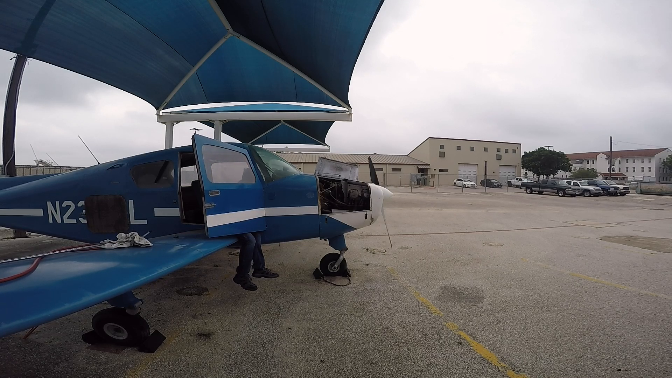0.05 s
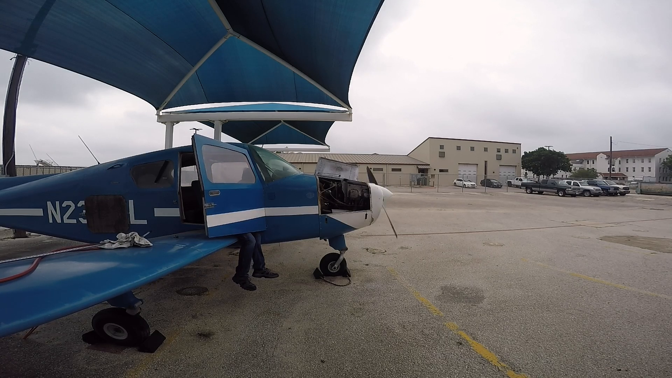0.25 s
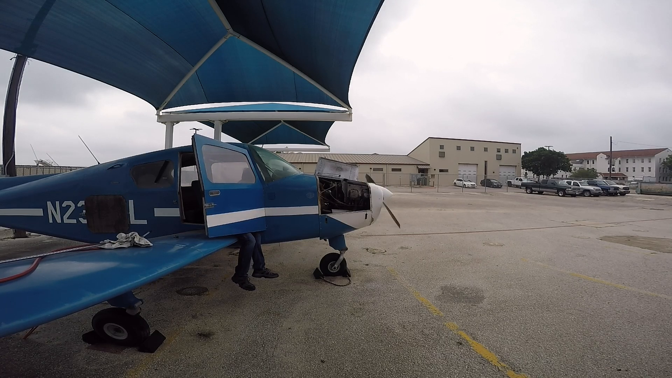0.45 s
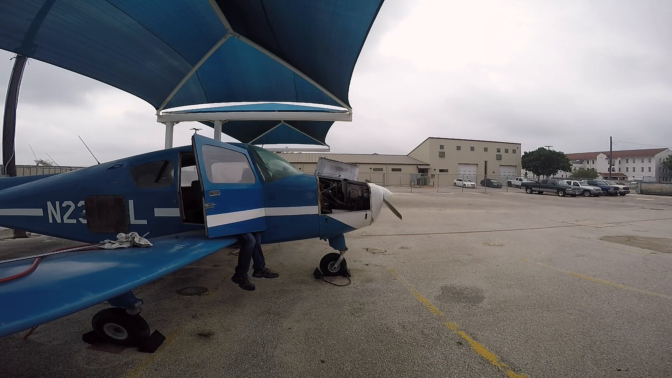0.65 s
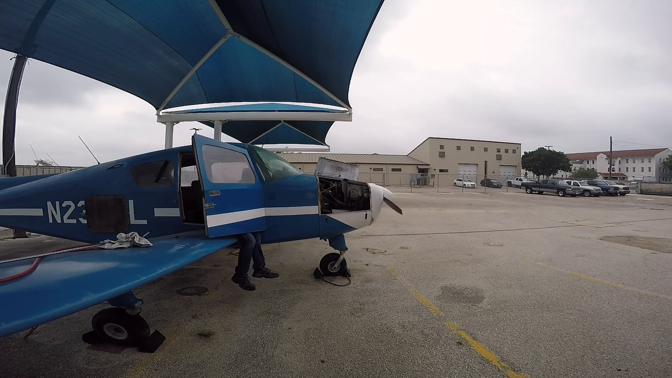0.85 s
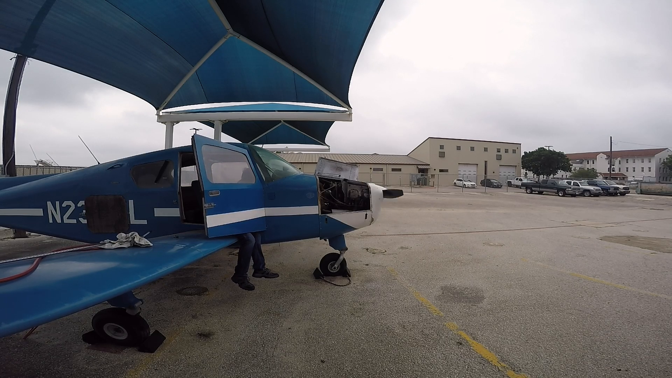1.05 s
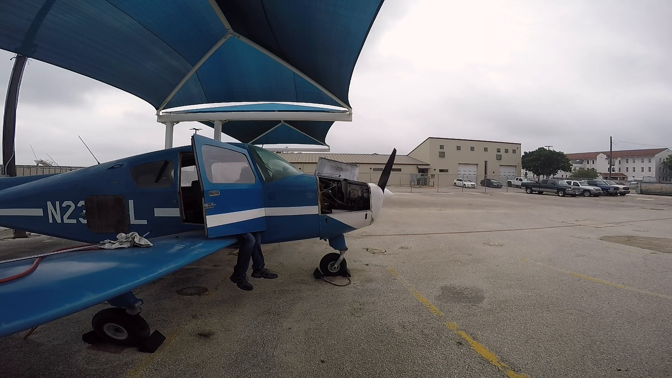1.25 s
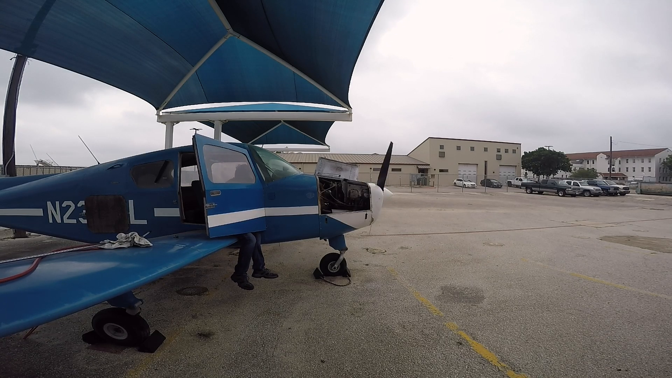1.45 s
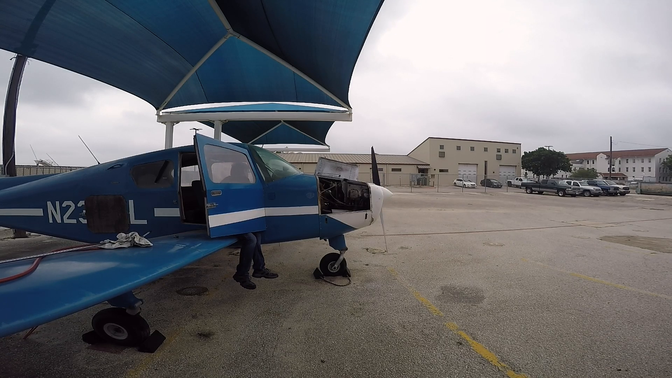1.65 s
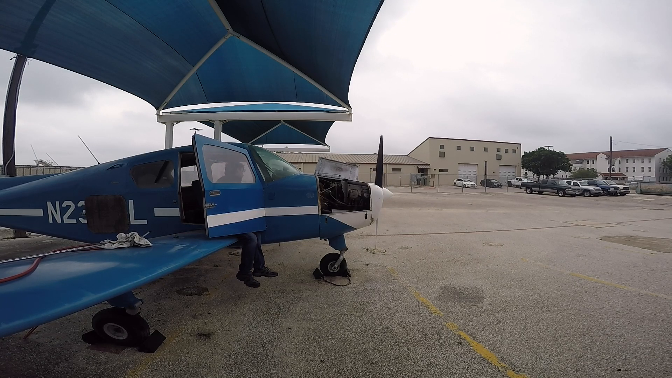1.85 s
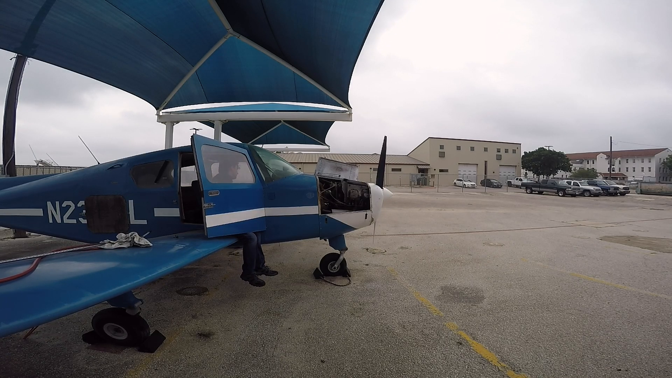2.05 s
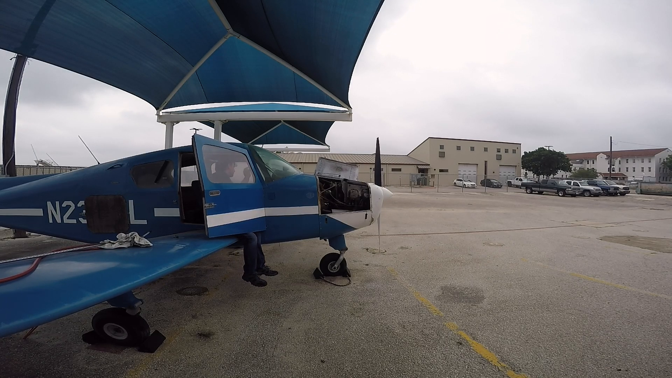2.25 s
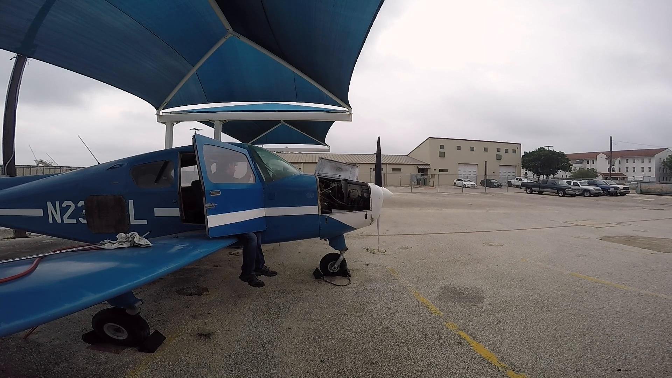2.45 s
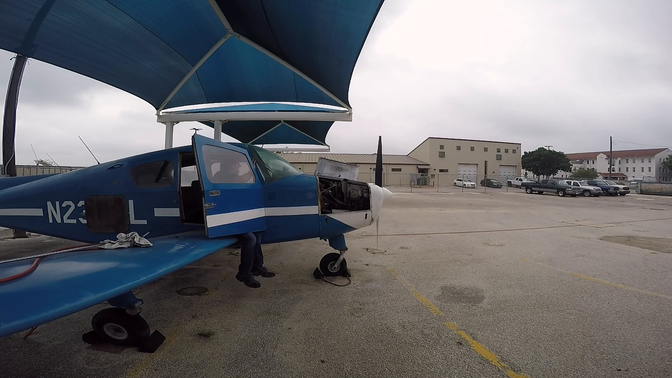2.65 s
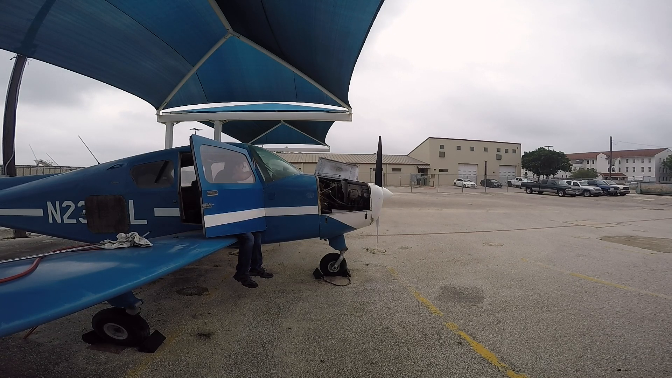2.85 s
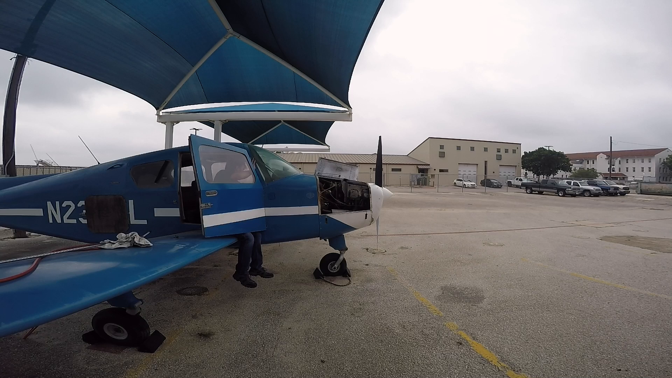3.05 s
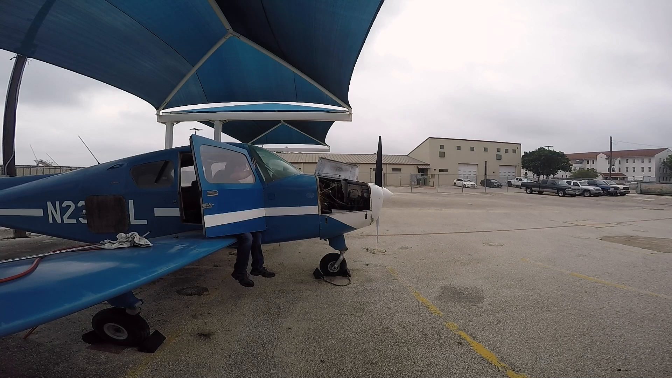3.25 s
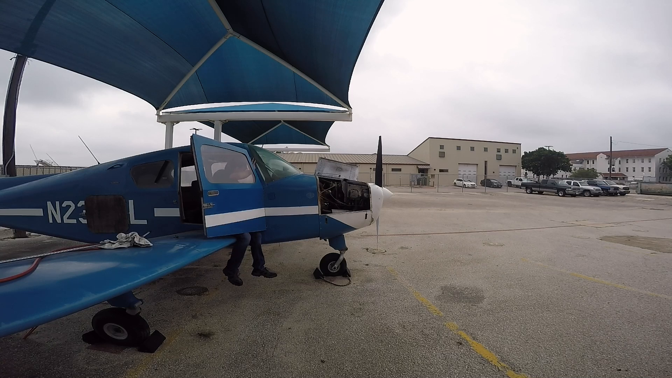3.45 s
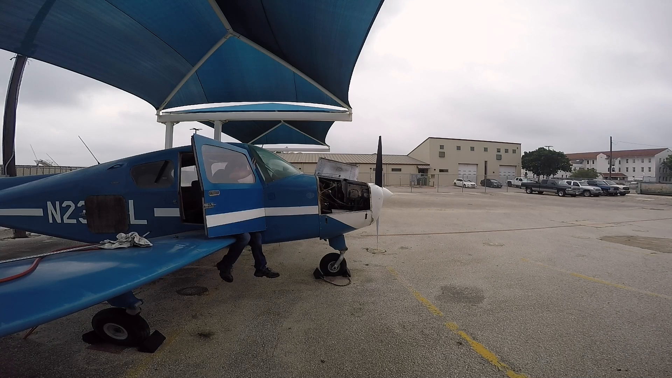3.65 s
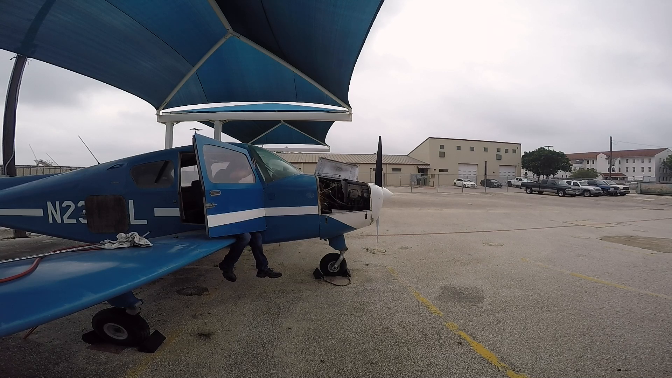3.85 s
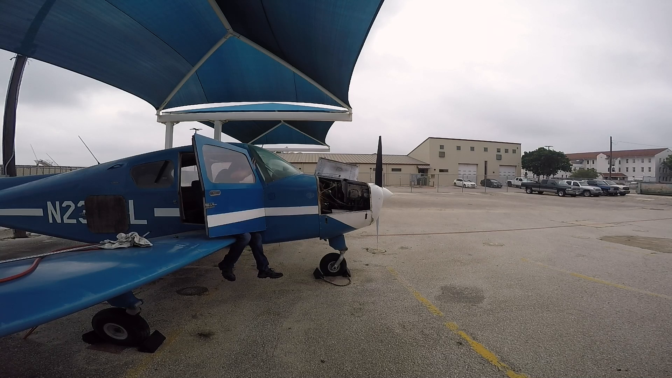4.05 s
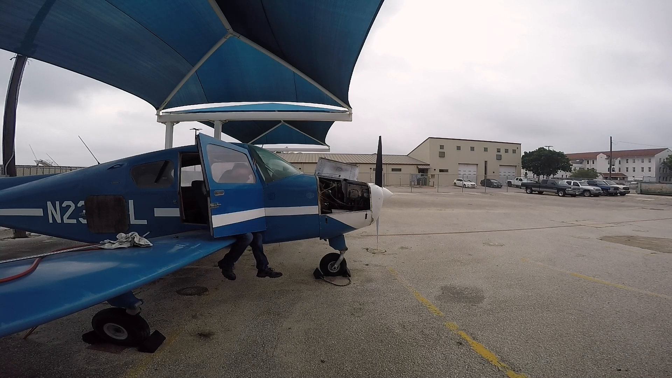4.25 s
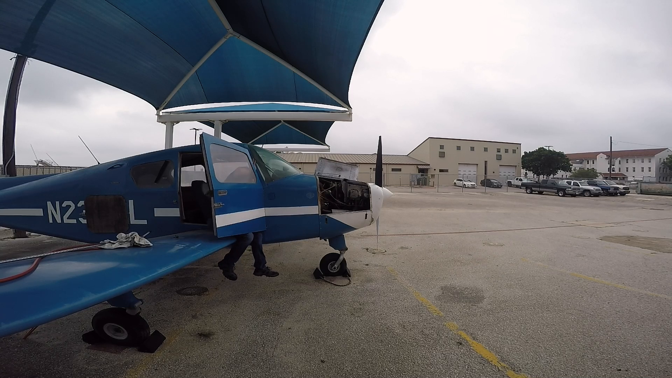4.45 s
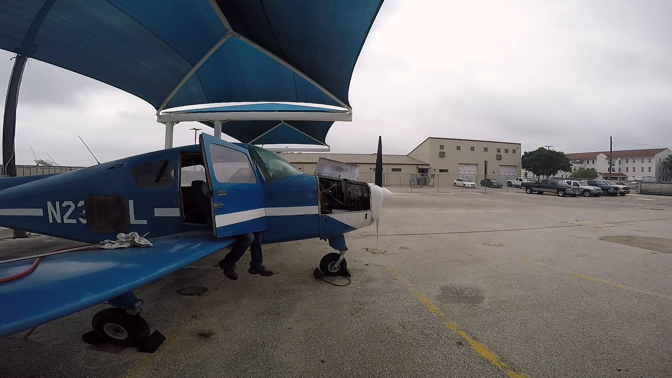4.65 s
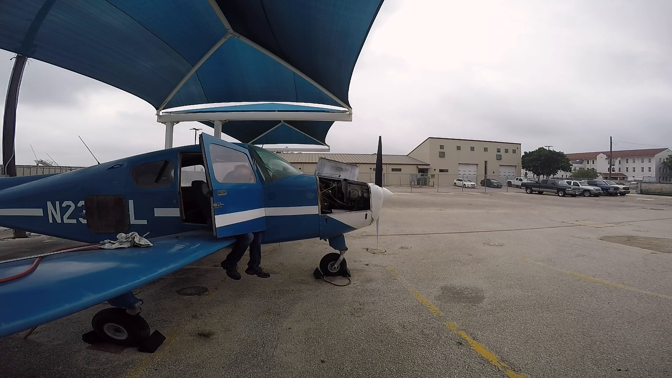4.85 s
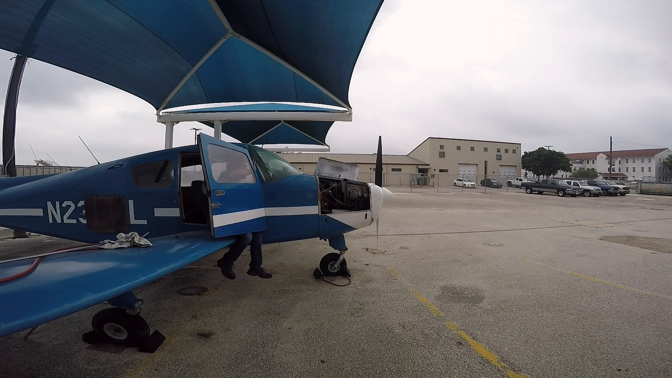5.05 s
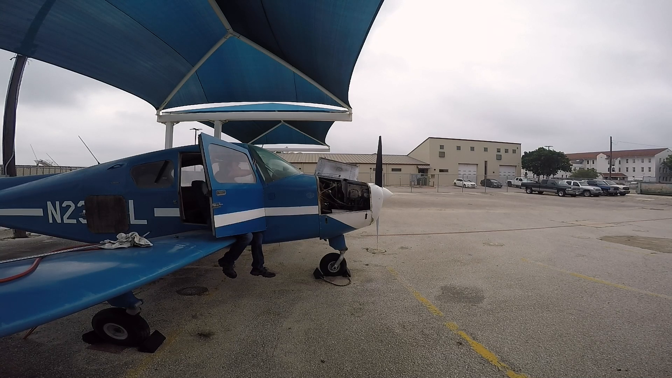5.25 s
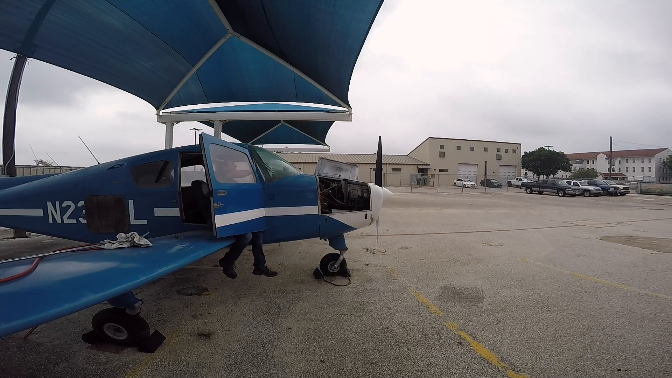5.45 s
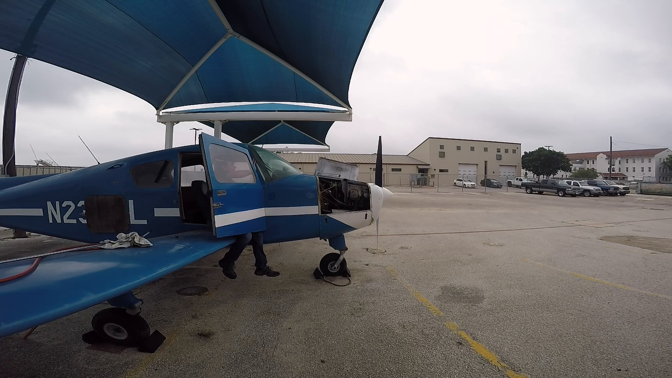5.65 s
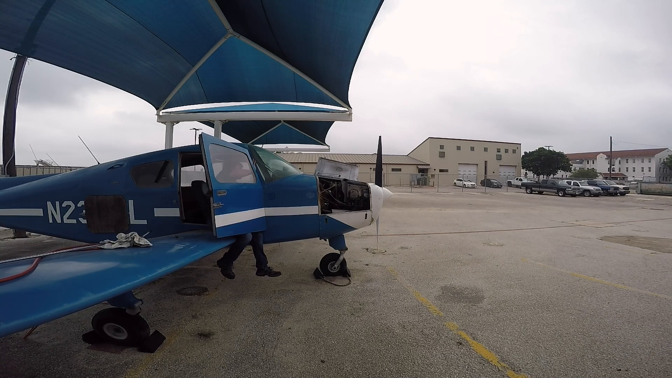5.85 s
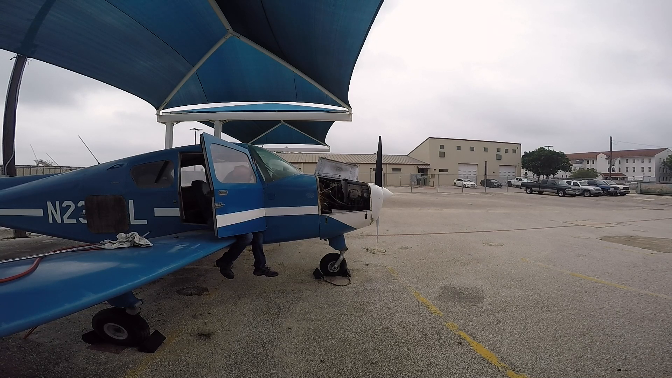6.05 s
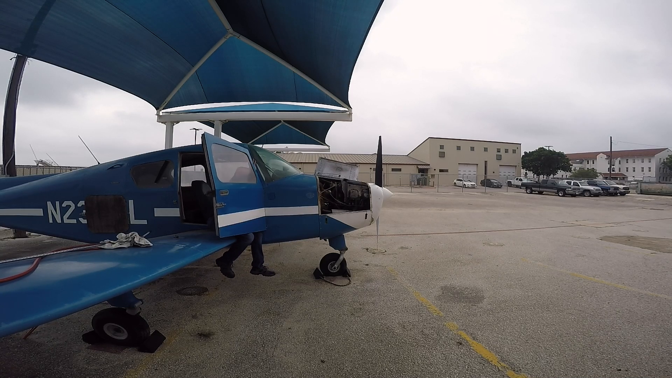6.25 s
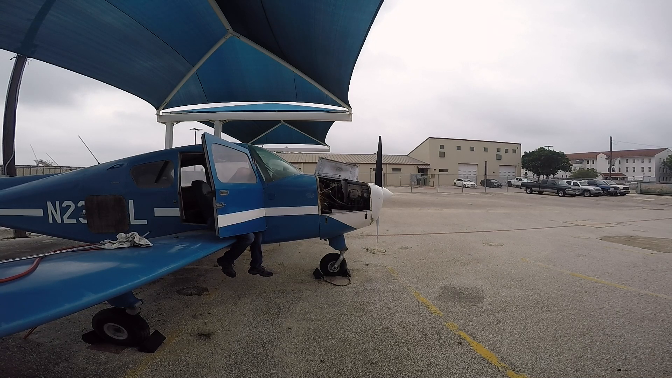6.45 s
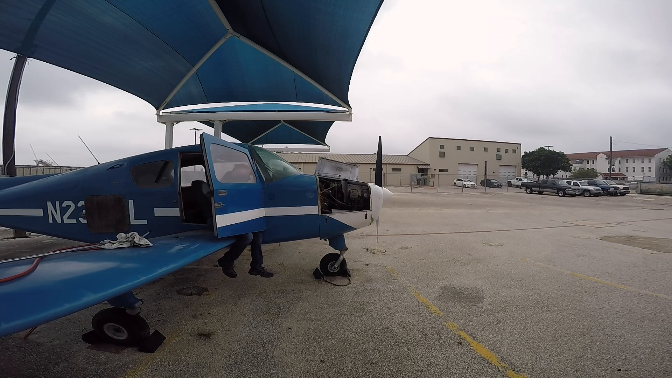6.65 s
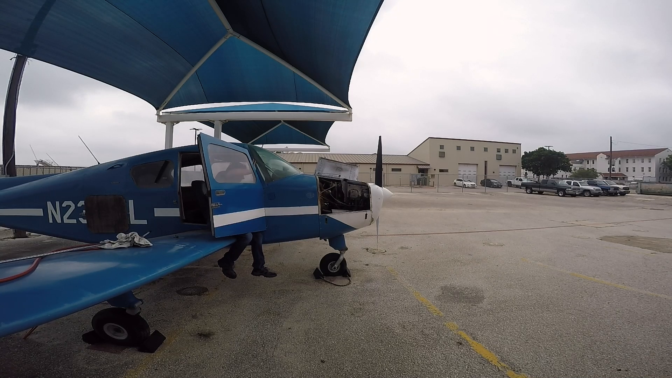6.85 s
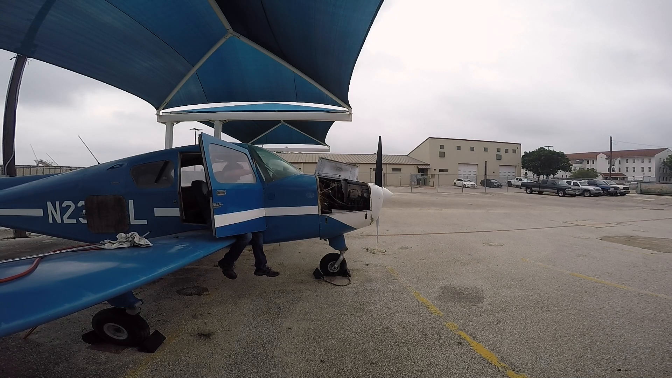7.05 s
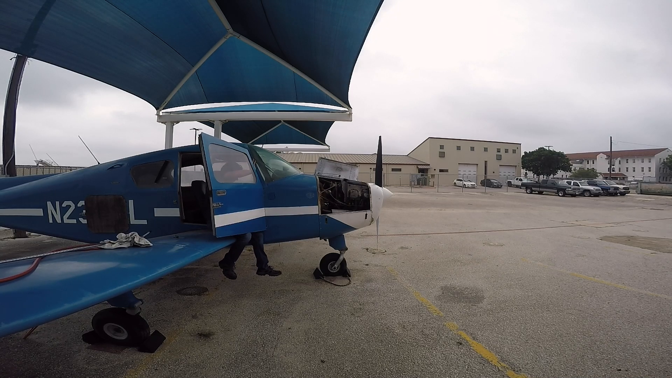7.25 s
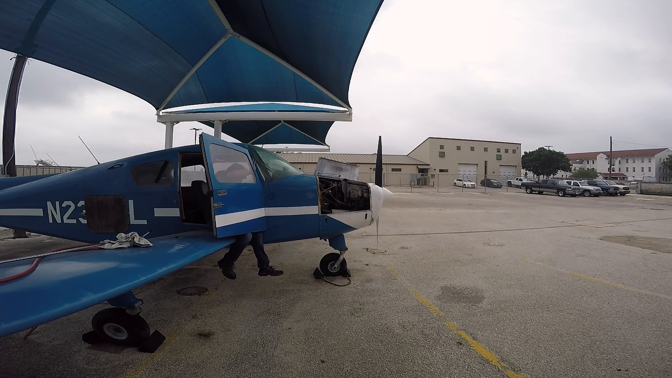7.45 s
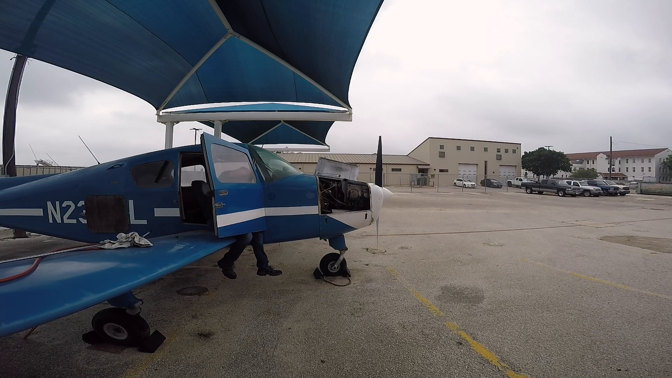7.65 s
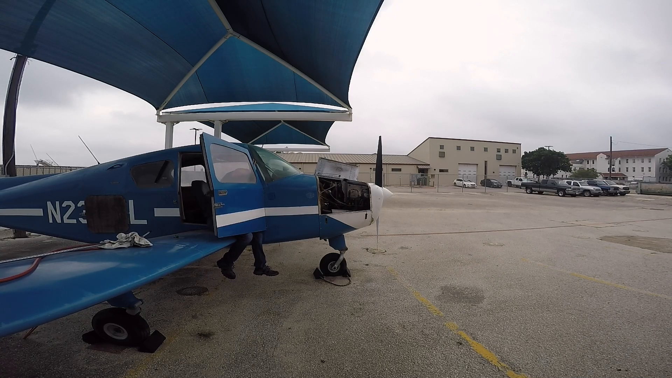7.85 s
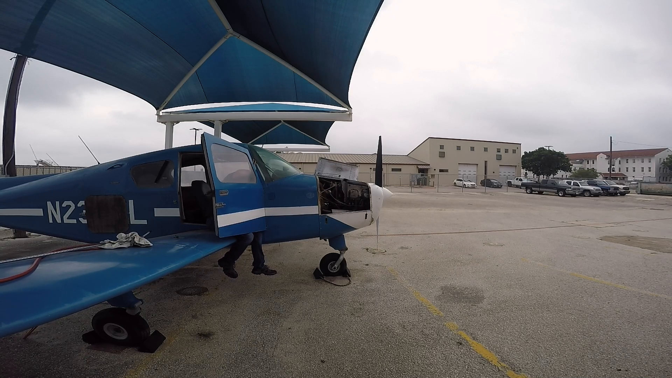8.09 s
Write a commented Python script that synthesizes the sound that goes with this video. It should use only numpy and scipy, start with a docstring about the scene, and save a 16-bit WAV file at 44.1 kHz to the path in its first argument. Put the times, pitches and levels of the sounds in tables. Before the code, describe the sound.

From the start, a light aircraft's piston engine cranks on its starter close to the microphone, outdoors with a slight dull echo. Gears rasp and clatter in even chugs, about five a second. At about 1.2 seconds the crank stalls without firing and the starter is released. The propeller rocks back with a metallic clatter and groan around 1.5 seconds, and a hissing, falling whine fades shortly after 2 seconds. Throughout, another engine idles farther off with a steady low throb and rapid ticking, over the airfield's low rumble; this quieter background continues to the end at about 8 seconds. Short, light knocks with a brief panel rattle come from the cabin near 1.6, 2, 4.1, 4.7, 5.9 and 6.4 seconds. Very faint, thin squeals waver in the distance around 4 seconds and again from about 6.3 to 7.7 seconds.

```python
"""A light aircraft fails to start

Close by, under a shade canopy, one microphone hears a piston engine cranked on its starter. The gears
rasp up each compression and clatter as it lets go. The crank stalls, the starter is released and the
propeller rocks back; the engine never fires. Out on the open ramp another engine idles and ticks
throughout, over a low rumble. There are a few knocks from the cabin and faint squeals far off."""
import sys
import numpy as np
from scipy import signal
from scipy.fft import rfft, irfft
from scipy.io import wavfile
from scipy.ndimage import uniform_filter1d

SR = 44100
rng = np.random.default_rng(int(sys.argv[2]) if len(sys.argv) > 2 else 0)


def to_wav(s):
    """Save 16-bit WAV."""
    ch = np.atleast_2d(s).T  # columns
    pcm = np.round(np.clip(ch, -1, 1) * 32767)  # PCM
    wavfile.write(sys.argv[1], SR, pcm.astype(np.int16))


N = 358091
T = np.arange(N) / SR
HZ = np.fft.rfftfreq(8192, 1 / SR)
RELEASE_S, UNMESH_S = 1.315, 1.57  # the current is cut; the pinion leaves the ring gear

# Pistons topping their compressions. Each row: time in seconds, clatter in dB, whine on the way up in dB.
COMPRESSIONS = [(-.05, -11.5, -46), (.153, -12.5, -42), (.373, -12, -47), (.584, -12.5, -50),
                (.797, -13.5, -26), (.994, -14.5, -40)]
# The compression that stalls the crank: start and end in seconds, rasp in dB, whine in dB.
STALL = (1.1278, 1.3016, -18, -30)
# The gears snatch once going into the stall: start and end in seconds.
JOLT = (1.188, 1.201)
# Teeth scraping as the crank runs backwards. Each row: start and end in seconds, rasp in dB.
BACK_SCRAPES = [(1.321, 1.348, -22), (1.48, 1.59, -30)]
# Spectra of the teeth meshing and rasping. Each row: frequency in Hz, relative level in dB.
MESH_SPECTRUM = [(120, -22), (300, 4), (1200, 2.5), (2300, 3.5), (3200, 1.5), (5500, -1.5), (8000, -1),
                 (12000, -12), (15000, -15)]
RASP_SPECTRUM = [(150, -7.5), (600, -11.5), (1500, -10), (2800, 3.5), (4000, -2.5), (6300, -15),
                 (7100, 0.5), (8700, 2.5), (9400, -6.5), (11400, -10.5), (12050, -3), (12700, -14),
                 (15000, -39)]


def starter(teeth_per_s=463, surge=.075, sag=.02, wobble=.018, squeeze_s=.102, rasp_db=-18.5,
            mesh_db=-30, pinion_db=-44.5, jolt_db=6):
    """Close by, gear teeth strike in turn; they slow, rasp and whine under load, then race as it lets go."""
    squeezes = [(top - squeeze_s, top, rasp_db, db) for top, _, db in COMPRESSIONS] + [STALL]
    strain = sum(arch(start, end) ** .8 for start, end, _, _ in squeezes)
    relief = sum(blow(top, rise=.012, fall=.06) for top, _, _ in COMPRESSIONS)
    speed = decay(UNMESH_S, fall=.38) * (1 + surge * relief - sag * strain + wobble * drift(30))
    teeth = np.cumsum(teeth_per_s * speed) / SR
    tooth_size = gain_of(2.6 * drift(320))
    strikes = np.diff(np.floor(teeth), prepend=0) * tooth_size * np.sqrt(SR / teeth_per_s)
    strikes = colour(strikes, spectrum([(900, -9), (1400, -6), (1900, 1), (15000, 2)]))  # small hard teeth
    contact = 1 + .45 * np.cos(2 * np.pi * teeth)
    grit = contact * rattle(5000, spread_db=4.6)
    driven = gain_of(mesh_db + strain) * decay(RELEASE_S, fall=.027)  # 1 dB louder at full strain
    coasting = gain_of(pinion_db) * blow(RELEASE_S, rise=UNMESH_S - RELEASE_S, fall=.32)
    mesh = colour((strikes + grit) * (driven + coasting), housing() * spectrum(MESH_SPECTRUM))
    load = sum(gain_of(db) * arch(start, end) ** .8 for start, end, db, *_ in squeezes + BACK_SCRAPES)
    load *= gain_of(jolt_db * arch(*JOLT))
    scrape = unit_rms(contact * rattle(7000, spread_db=2.1) * gain_of(1.14 * drift(88)))
    rasp = colour(load * scrape, housing() * spectrum(RASP_SPECTRUM))
    whine_level = sum(gain_of(db) * arch(start, end) ** .5 for start, end, _, db in squeezes)
    whine = whine_level * np.sqrt(2) * np.sin(2 * np.pi * 4 * teeth)  # fourth harmonic of the tooth rate
    return mesh + rasp + whine


# The crank falling back into the slack of the gears. Each row: start in seconds, level in dB,
# rise and fall time constant in seconds, tilt in dB at treble_hz.
RECOILS = [(1.325, -28.5, 0.017, 0.071, -10), (1.392, -21, 0.057, 0.091, -3.5)]
# Spectrum of the blows on the housing. Each row: frequency in Hz, relative level in dB.
CLATTER_SPECTRUM = [(100, -53), (230, 6), (500, 5.5), (1100, 3.5), (2500, 8), (4500, 6.5), (5800, -2.5),
                    (8000, -0.5), (11000, -4), (15000, -17.5)]


def gear_clatter(crack_db=-20.5, rise_s=.013, fall_s=.052, tilt_db=-2, treble_hz=2200, rebound=.17):
    """Past each top, trapped air throws the crank forward: the slack gears crack, clatter and rebound."""
    impacts = unit_rms(rattle(6000, spread_db=.97) * gain_of(1.4 * drift(59)))
    treble = HZ ** 2 / (HZ ** 2 + treble_hz ** 2)
    metal = housing() * spectrum(CLATTER_SPECTRUM)
    # the first teeth to meet strike hard and bright
    cracks = gain_of(crack_db) * sum(blow(top, rise=.0061, fall=.015) for top, _, _ in COMPRESSIONS)
    out = colour(cracks * rattle(6000, spread_db=1), metal * treble)
    throws = [(top, db, rise_s, fall_s, tilt_db) for top, db, _ in COMPRESSIONS]
    for start, db, rise, fall, tilt in throws + RECOILS:
        force = blow(start, rise, fall) + rebound * arch(start + .038, start + .12)
        out += colour(impacts * gain_of(db) * force, metal * gain_of(2 * tilt * treble))
    return out


# The propeller rocking back: start and end in seconds, resonance and half-width in Hz, level in dB.
GROAN = (1.38, 1.5745, 1150, 450, -25.5)


def gear_groan():
    """The gears drag backwards through one broad resonance of the housing."""
    start, end, hz, width, db = GROAN
    drag = rattle(4000, spread_db=1.65) * arch(start, end) ** .99 * gain_of(db)
    return colour(drag, housing() * resonance(hz, width))


# The motor coasting: a time in seconds, commutator bars per second then, slowing time constant in seconds.
COAST = (1.66, 780, .31)
# Whine of its brushes. Each row: multiple of the bar rate, relative level in dB.
BRUSH_HARMONICS = [(2, -7), (3, -8), (4, -8), (6, -2), (7, 0), (8, -2), (10, -6)]
# Spectrum of the brushes. Each row: frequency in Hz, relative level in dB.
BRUSH_SPECTRUM = [(300, -3), (1200, 12), (2500, -9), (3500, 2), (4500, 1), (5800, 0), (6800, 2), (8000, -9),
                  (10000, -1), (15000, -22)]


def starter_rundown(level_db=-37.5, slows_from_s=1.45):
    """Released, the starter motor coasts; its brushes hiss and their rough whine falls away."""
    at_s, bars_per_s, slowing_s = COAST
    bars = np.cumsum(bars_per_s * np.exp(-(np.maximum(T, slows_from_s) - at_s) / slowing_s)) / SR
    whine = sum(gain_of(db) * np.sin(2 * np.pi * k * bars + 1.1 * drift(90)) for k, db in BRUSH_HARMONICS)
    friction = unit_rms(.38 * unit_rms(whine) + rng.standard_normal(N))
    level = gain_of(level_db) * blow(RELEASE_S, rise=.23, fall=.18)
    return colour(friction * level, spectrum(BRUSH_SPECTRUM))


# Resonances of the crankcase and starter housing. Each row: frequency in Hz, width in Hz, lift in dB.
HOUSING_MODES = [(246, 53, 3), (614.5, 22, 10.5), (686, 26, 9), (923, 38, 10), (1000, 150, 6),
                 (1176, 72, 11.5), (1254, 85, 5.5), (1360, 210, 5.5), (1531, 41, 10), (1816, 19, 13),
                 (1923, 68, 11), (2080, 61, 12.5), (2293, 97, 11.5), (2380, 52, 13.5), (2826, 160, 11.5),
                 (3150, 58, 4.5), (3510, 110, 4.5), (4320, 140, 1), (4500, 120, -5.5), (5070, 70, 5),
                 (7150, 970, 7.5), (8470, 750, 8), (10040, 180, 9), (12010, 620, 8.5)]


def housing():
    """Gain of the engine's metal over HZ: modes with a positive lift stand on a flat base."""
    peaks = sum((gain_of(db) ** 2 - 1).clip(0) / (1 + (2 * (HZ - hz) / width) ** 2) ** 1.62
                for hz, width, db in HOUSING_MODES)
    return np.sqrt(1 + peaks)


# Knocks about the cabin. Each row: start in seconds, level in dB, the rattle's fall time constant
# in seconds, pitch of the clack in Hz.
KNOCKS = [(1.631, -37, 0.0085, 2160), (1.969, -35, 0.038, 3000), (4.107, -43.5, 0.02, 1380),
          (4.695, -33, 0.031, 1070), (4.736, -43, 0.012, 2500), (5.884, -39, 0.01, 970),
          (6.449, -33.5, 0.019, 1060)]
# Spectrum of the rattling panel. Each row: frequency in Hz, relative level in dB.
PANEL_SPECTRUM = [(150, 11.5), (400, 11.5), (1000, 2.5), (1700, 5), (2600, 0.5), (4200, -6), (6000, -14),
                  (8000, -3), (15000, -20)]


def cabin_knocks():
    """From the near aircraft, each knock is a short pitched clack and a brief rattle of the panel."""
    out = np.zeros(N)
    for start, db, fall, hz in KNOCKS:
        noise = gain_of(db) * rng.standard_normal(N)
        out += colour(noise * blow(start, rise=.0058, fall=fall), spectrum(PANEL_SPECTRUM))
        out += colour(noise * blow(start, rise=.00058, fall=.0072), resonance(hz, half_width_hz=260))
    return out


def canopy(direct, wet_db=-20, t60_s=.39, dull_hz=3500, echoes_per_s=2000):
    """Weak, dull echoes off canopy, wing and concrete follow the direct sound to the microphone."""
    t = T[:SR]
    taps = rng.standard_normal(SR) * (rng.random(SR) < echoes_per_s / SR)
    taps *= (t > .008) * gain_of(-60 * t / t60_s)
    echoes = signal.oaconvolve(direct, taps / np.linalg.norm(taps))[:N]
    return direct + gain_of(wet_db) * colour(echoes, 1 / np.sqrt(1 + (HZ / dull_hz) ** 2))


# Speed of the other engine. Each row: time in seconds, firings per second.
IDLE_SPEED = [(2.0, 25.861), (6.0, 26.417), (6.8, 26.121), (7.2, 26.465)]
# Its exhaust note. Each row: multiple of the firing rate, level in dB.
EXHAUST_HARMONICS = [(2, -32), (3, -31), (4, -37), (5, -50), (6, -67), (8, -63.5), (10, -53)]
# Tones of its block. Each row: frequency in Hz, level in dB.
BLOCK_TONES = [(1405, -63.5), (1534, -64.5), (1647, -67.5), (1782, -60.5)]


def idling_engine():
    """Out on the ramp, each firing gives an exhaust throb and a tick; faint block tones flicker."""
    firings = np.cumsum(np.interp(T, *np.transpose(IDLE_SPEED))) / SR
    exhaust = np.zeros(N)
    for k, db in EXHAUST_HARMONICS:
        level = gain_of(db + 1.06 * drift(2.4)) * np.sqrt(2)
        exhaust += level * np.sin(2 * np.pi * (k * firings + rng.random()) + .098 * drift(5))
    ticking = valve_gear(firings + .157)  # the ticks fall at a set point within each firing cycle
    block = np.zeros(N)
    for hz, db in BLOCK_TONES:
        phase = 2 * np.pi * hz * T
        block += gain_of(db) * (drift(12) * np.cos(phase) + drift(15) * np.sin(phase)) / np.sqrt(2)
    return exhaust + ticking + block


# The ticks grow softer and less even. Each row: time in seconds, level in dB, tick-to-tick scatter in dB.
TICK_LEVELS = [(3.6, -42, 1.1), (5.2, -44, 2.5)]
# Spectrum of the ticks. Each row: frequency in Hz, relative level in dB.
TICK_SPECTRUM = [(700, -36), (1500, 1), (2200, -5.5), (2900, 1.5), (3400, -2), (4100, -19), (4700, -4.5),
                 (5400, -23), (6400, -5.5), (7000, -2.5), (9300, -0.5), (11200, -2.5), (12000, -3.5),
                 (14100, -5.5), (15200, -9.5)]
# Ringing valve gear. Each row: frequency and half-width in Hz, level in dB, cylinder 0 or 1.
VALVE_MODES = [(2950, 55, -61, 0), (2780, 65, -64, 1), (2940, 55, -67, 1)]


def valve_gear(firings, rise_cycles=.13, mode_scatter_db=3.2):
    """A valve snaps shut at each firing, rattles briefly and rings; alternate cylinders ring differently."""
    count, age = np.divmod(firings, 1)
    count = count.astype(int)
    times, tick_db, scatter_db = np.transpose(TICK_LEVELS)
    chance = np.minimum(rng.standard_normal(N), 1)[count]  # one draw for each tick
    size = gain_of(np.interp(T, times, scatter_db) * chance)
    past_peak = np.maximum(age - rise_cycles, 0)
    dying = .89 * np.exp(-past_peak / .45) + .18 * np.exp(-past_peak / .29)
    stroke = np.minimum(age / rise_cycles, 1) * dying
    ripple = unit_rms(uniform_filter1d(rng.standard_normal(len(HZ)), size=30))  # many small resonances
    metal = spectrum(TICK_SPECTRUM) * gain_of(mode_scatter_db * ripple)
    ticks = colour(size * stroke * rattle(9000, spread_db=3.3), metal)
    seating = size * np.diff(count, prepend=0) * gain_of(2 * drift(10))  # now hard, now soft
    rings = sum(gain_of(db) * unit_rms(colour(seating * (count % 2 == cylinder), resonance(hz, width)))
                for hz, width, db, cylinder in VALVE_MODES)
    return gain_of(np.interp(T, times, tick_db)) * ticks + rings


# Rumble of the open ramp. Each row: frequency in Hz, relative level in dB.
RAMP_SPECTRUM = [(6, -19.5), (15, 6.5), (45, -3), (70, -5.5), (120, -6.5), (170, -16), (280, -19),
                 (450, -27), (900, -32.5), (1800, -40.5), (3500, -43.5), (5400, -48.5), (8000, -45.5),
                 (15000, -71)]


def ramp_air(rumble_db=-30.5, wash_db=-29):
    """The airfield rumbles all around; the near propeller adds soft buffets of air until it stops."""
    rumble = unit_rms(colour(rng.standard_normal(N), spectrum(RAMP_SPECTRUM)))
    rumble *= gain_of(rumble_db + .33 * drift(.61))
    wash = spectrum([(8, 1.5), (25, 7.5), (60, -3.5), (130, -12), (300, -39), (2000, -106)])
    buffets = unit_rms(colour(rng.standard_normal(N), wash))
    turning = np.interp(T, [1.35, 1.7], [1, 0])
    return rumble + gain_of(wash_db) * buffets * turning


# Faint squeals. Each row: start and end in seconds, pitch in Hz, level in dB.
SQUEALS = [(3.7, 4.453, 1390, -60.5), (3.9, 4.3, 1840, -58), (6.25, 6.752, 2380, -56.5),
           (6.938, 7.7, 2376, -57), (7.283, 7.43, 2376, -54)]


def distant_squeals():
    """Far from the microphone, thin tones swell, waver and fade."""
    flutter = gain_of(3.8 * drift(33))
    wavering_time = np.cumsum(1 + .0017 * drift(15.3)) / SR
    return flutter * sum(gain_of(db) * arch(start, end) * np.sin(2 * np.pi * hz * wavering_time)
                         for start, end, hz, db in SQUEALS)


def gain_of(db):
    """Decibels to amplitude."""
    return 10 ** (np.asarray(db) / 20)


def unit_rms(x):
    """Scales to rms 1."""
    return x / np.sqrt(np.mean(x ** 2) + 1e-20)


def spectrum(points):
    """Gain over HZ through (Hz, dB) points."""
    hz, db = np.transpose(points)
    return gain_of(np.interp(np.log(HZ + 1), np.log(hz + 1), db))


def resonance(hz, half_width_hz):
    """Gain over HZ of a single peak."""
    return 1 / (1 + ((HZ - hz) / half_width_hz) ** 2)


def colour(x, gain):
    """Causal filter of unit energy, shaped by a gain over HZ: it rings after each blow."""
    cepstrum = irfft(np.log(gain + 1e-6))
    half = len(cepstrum) // 2
    cepstrum[1:half] *= 2
    cepstrum[half + 1:] = 0
    ring = irfft(np.exp(rfft(cepstrum)))[:half]
    return signal.oaconvolve(x, ring / np.linalg.norm(ring))[:N]


def drift(rate_hz):
    """Random wander up to about rate_hz, rms 1."""
    hz = np.fft.rfftfreq(N, 1 / SR)
    return unit_rms(irfft(rfft(rng.standard_normal(N)) * np.exp(-(hz / rate_hz) ** 2), N))


def rattle(per_s, spread_db):
    """Dense small impacts of uneven size, rms 1."""
    size = gain_of(spread_db * np.clip(rng.standard_normal(N), -2, 2)) * rng.choice([-1, 1], N)
    return unit_rms(size * (rng.random(N) < per_s / SR))


def decay(start, fall):
    """Holds at 1 until start, then dies with time constant fall, in seconds."""
    return np.exp(-np.maximum(T - start, 0) / fall)


def blow(start, rise, fall):
    """An envelope that climbs for rise seconds and then dies away."""
    return np.clip((T - start) / rise, 0, 1) * decay(start + rise, fall)


def arch(start, end):
    """Half a sine between two times."""
    return np.sin(np.pi * np.clip((T - start) / (end - start), 0, 1)).clip(0)


def scene():
    """The cranking aircraft close by under its canopy, with the open ramp behind it, in mono."""
    aircraft = starter() + gear_clatter() + gear_groan() + starter_rundown() + cabin_knocks()
    return (canopy(aircraft) + idling_engine() + ramp_air() + distant_squeals())[None]


def record(dry, edge_hz=15350):
    """The microphone's channel cuts off steeply in the top treble."""
    lowpass = signal.firwin(701, edge_hz, window=("kaiser", 9), fs=SR)
    return signal.oaconvolve(dry, lowpass[None], "same")


dry = scene()
out = record(dry)
to_wav(out)
```